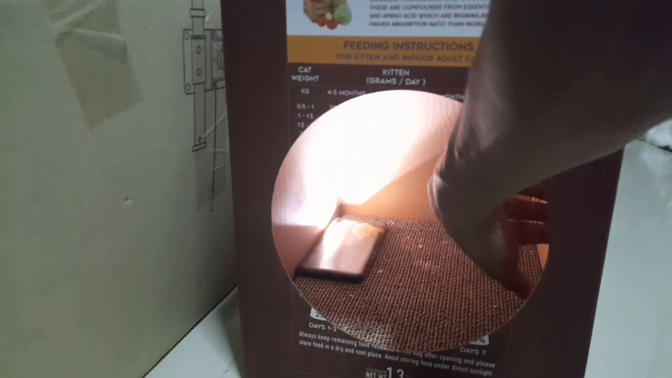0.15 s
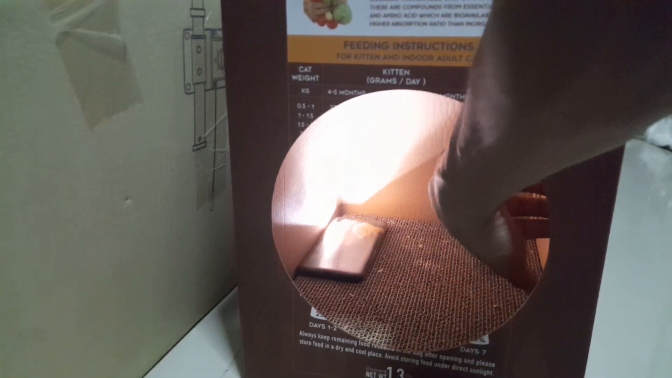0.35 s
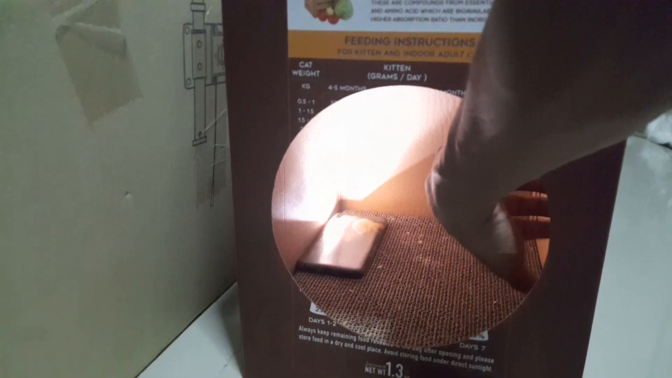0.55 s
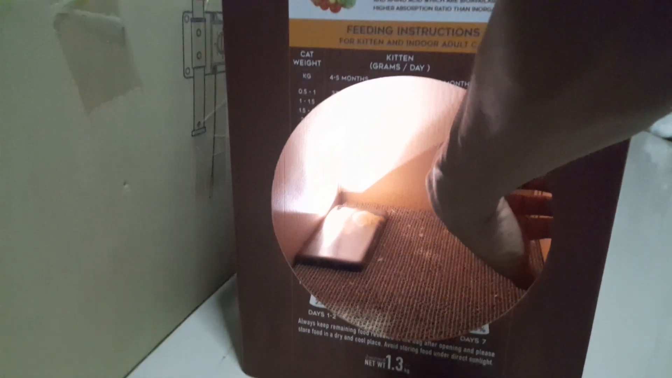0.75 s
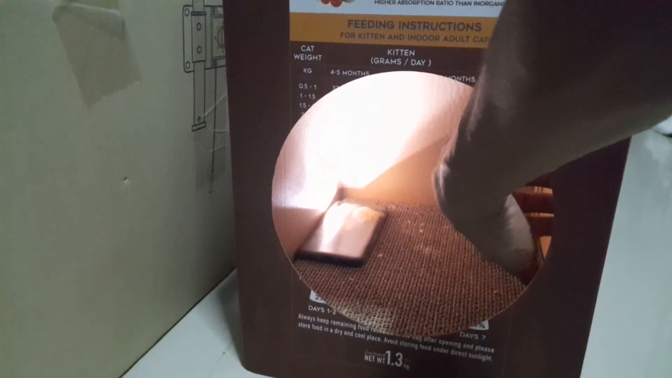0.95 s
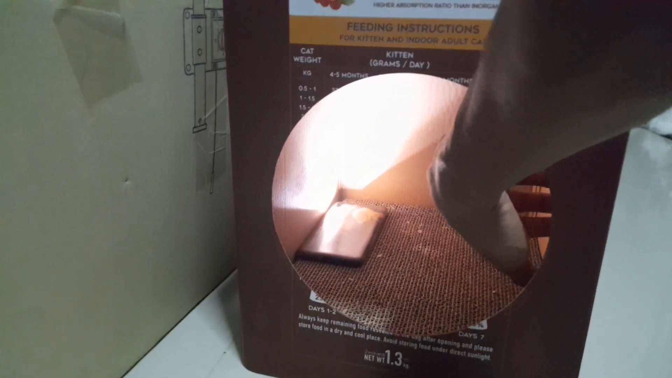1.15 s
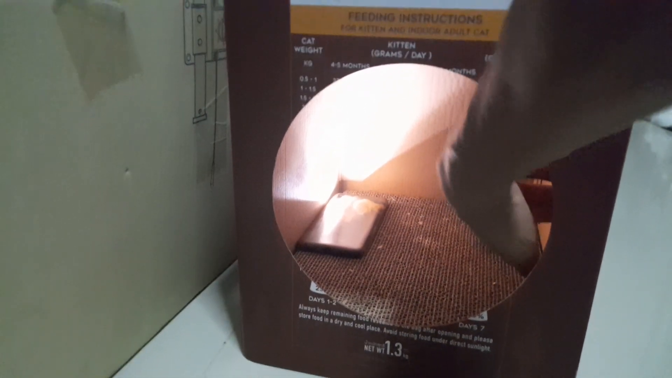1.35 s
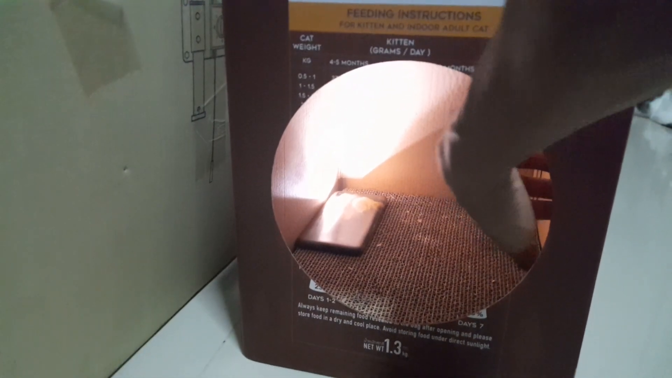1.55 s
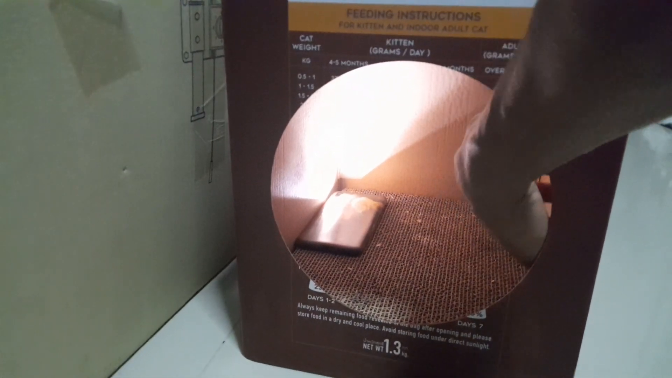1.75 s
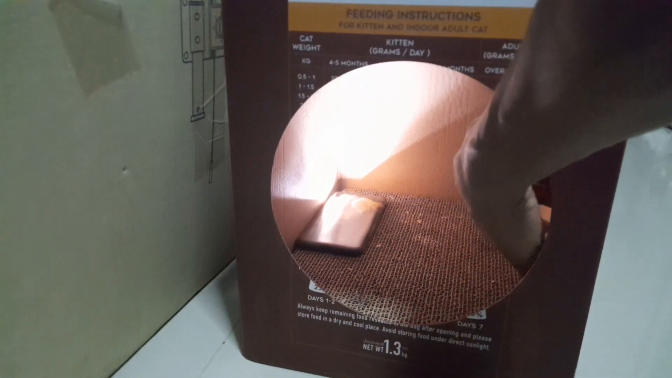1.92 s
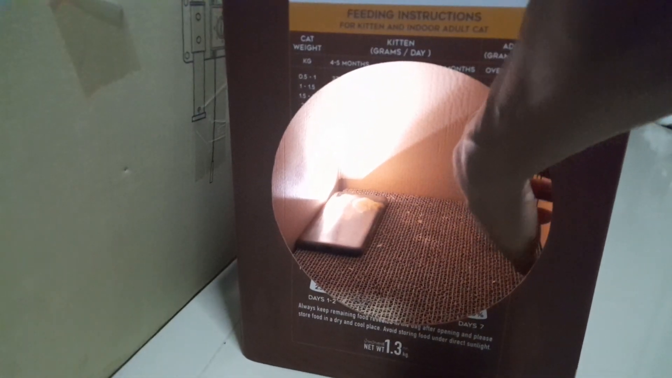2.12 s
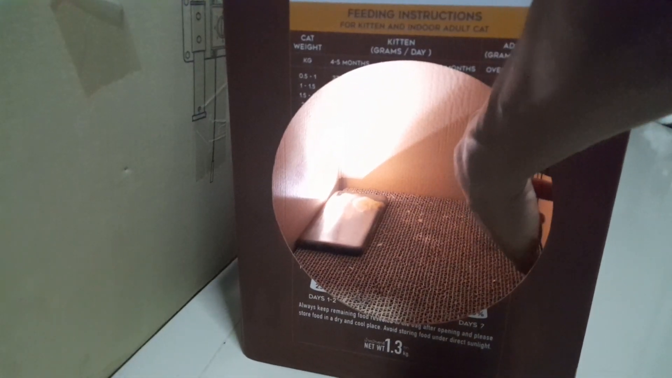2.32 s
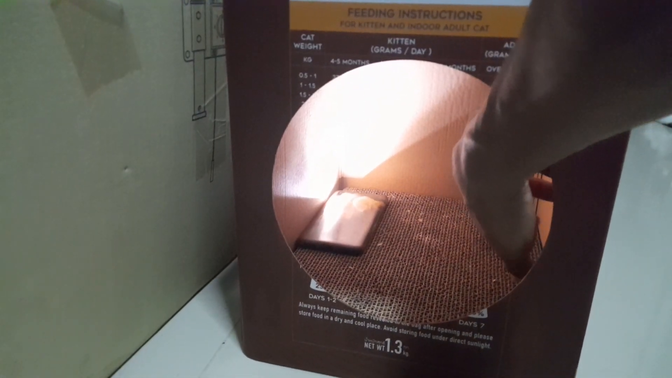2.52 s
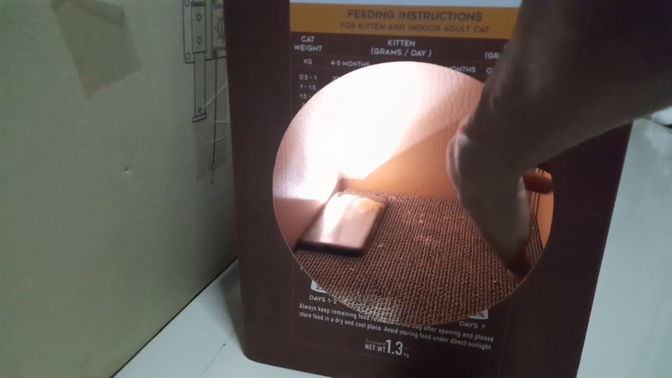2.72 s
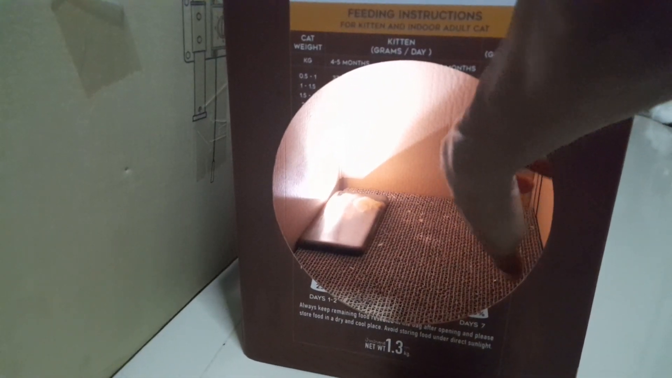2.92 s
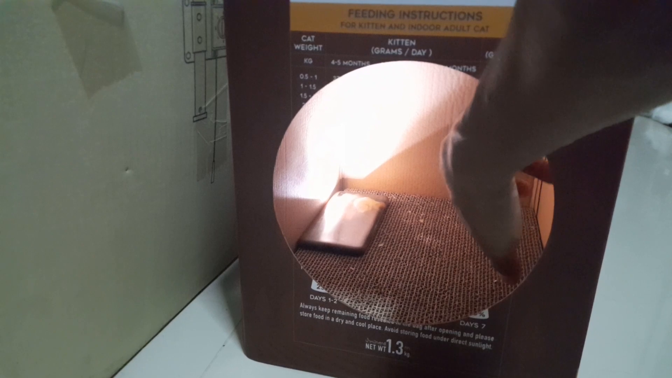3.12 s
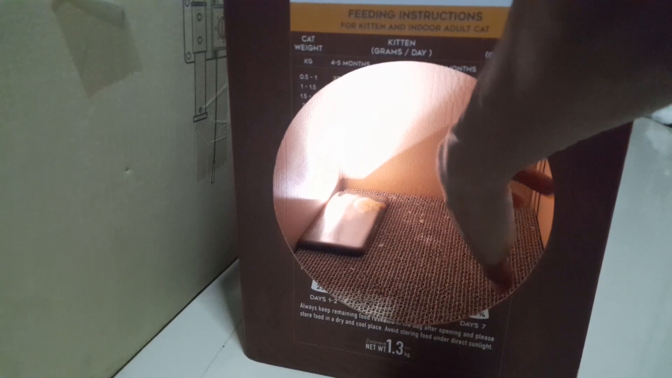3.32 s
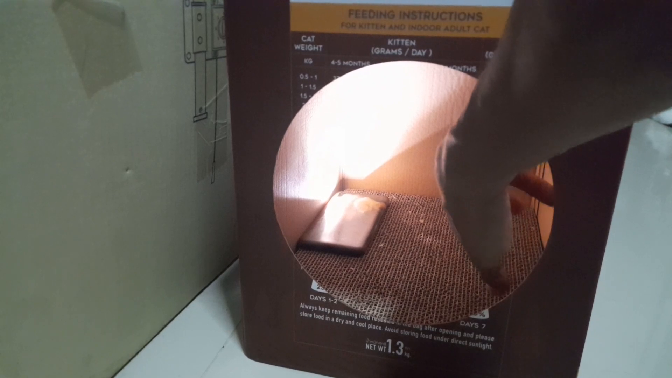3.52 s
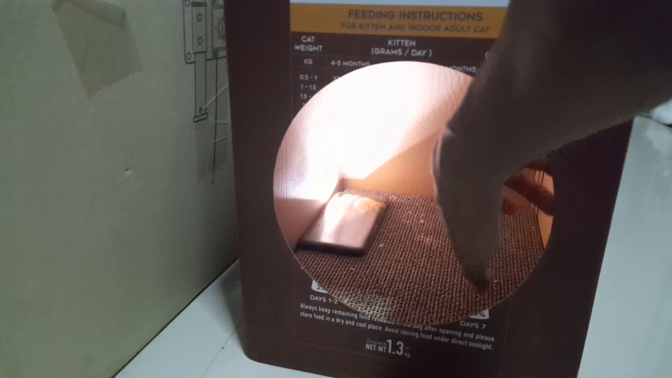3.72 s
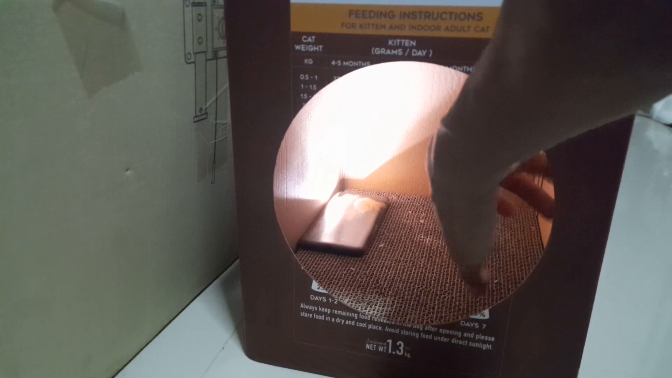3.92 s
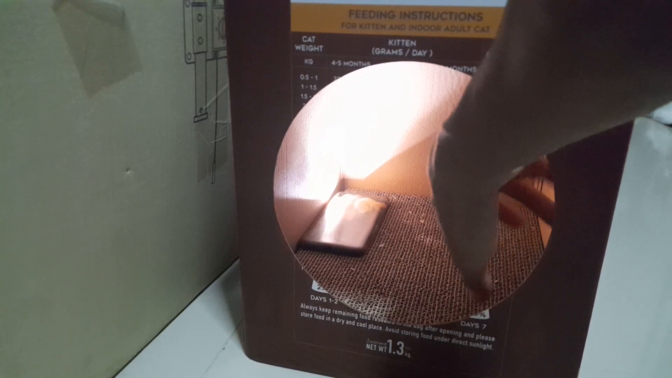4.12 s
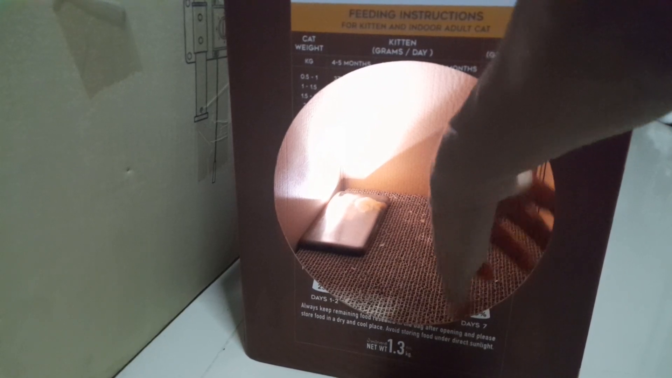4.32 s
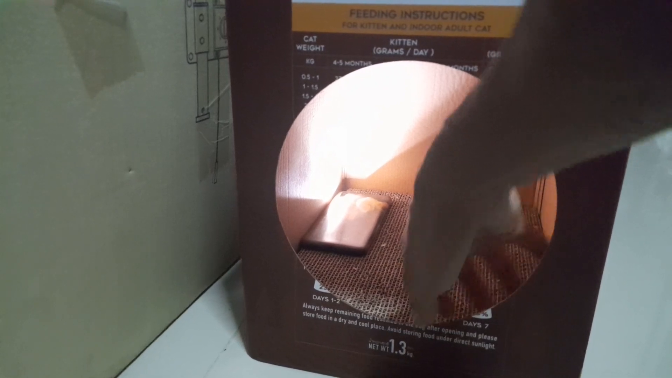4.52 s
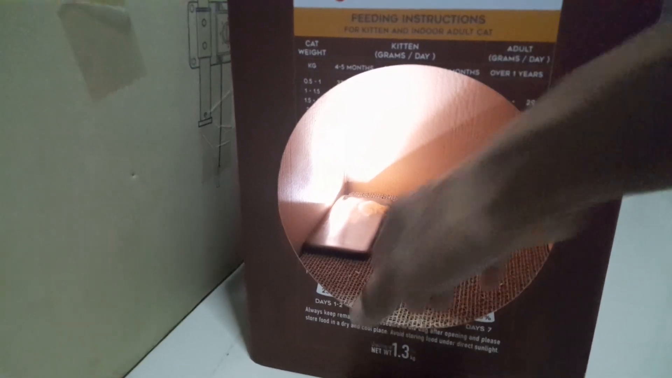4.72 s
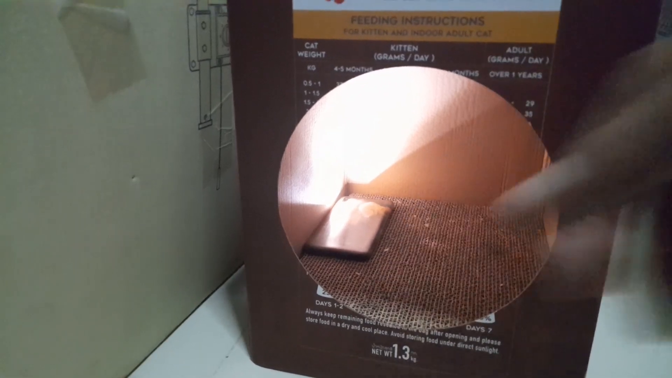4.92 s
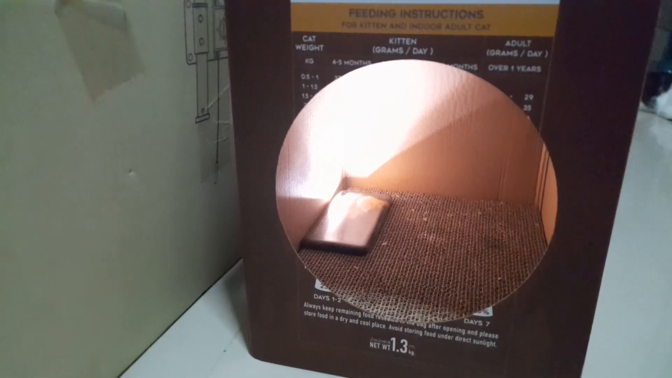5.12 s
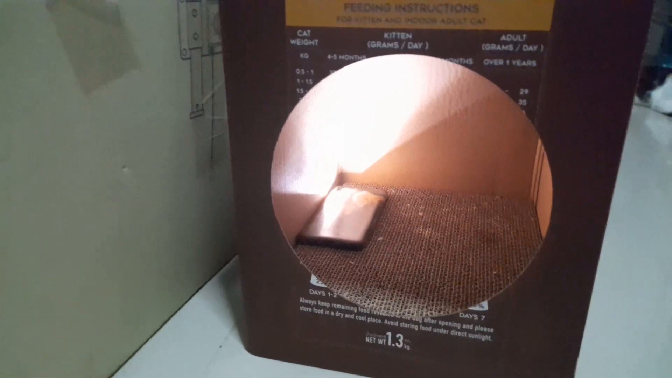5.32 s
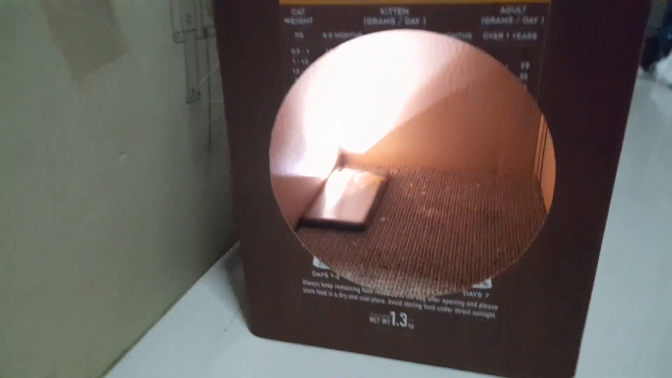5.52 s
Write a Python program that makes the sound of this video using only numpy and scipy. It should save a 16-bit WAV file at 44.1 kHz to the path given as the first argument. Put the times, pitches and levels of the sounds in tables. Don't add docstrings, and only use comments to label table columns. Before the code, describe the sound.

Fingers scratch corrugated cardboard inside a box in quick uneven bursts, with hollow low thumps, dry rasps and sharp taps over faint hiss.

```python
import sys
import numpy as np
from scipy import signal
from scipy.io import wavfile
from scipy.ndimage import uniform_filter1d

SR = 44100
rng = np.random.default_rng(int(sys.argv[2]) if len(sys.argv) > 2 else 0)


def generate_wav(sig):
    pcm = np.round(np.clip(np.atleast_2d(sig).T, -1, 1) * 32767).astype(np.int16)
    wavfile.write(sys.argv[1], SR, pcm)


def volts_from_db(level):
    exponent = np.asarray(level, float) / 20
    return 10 ** exponent


N = 245189

# peak [t/s], length [t/s], level [level/dB], flute rate [f/Hz]
GRAZES = [(0.015, 0.019, -31.5, 160), (.146, 0.048, -34, 162.8), (.578, 0.018, -26, 191.9),
          (.651, .014, -26, 176), (.983, 0.029, -31, 172), (1.138, 0.022, -38.5, 200.5),
          (1.338, 0.026, -41.5, 185), (1.384, .025, -39.5, 239.3), (1.417, 0.03, -32.5, 191.6),
          (1.45, 0.029, -33, 179.4), (1.52, 0.027, -41.5, 159.5), (1.553, .02, -43, 216),
          (1.82, .08, -54, 206.5), (1.925, 0.053, -36.5, 174), (1.975, .03, -42, 133.7),
          (2.041, 0.024, -28, 125.5), (2.11, 0.028, -40.5, 172), (2.165, 0.022, -40, 187.1),
          (2.231, 0.027, -30, 133.9), (2.494, 0.027, -37.5, 213), (2.792, .034, -40.5, 224),
          (3.085, 0.05, -35.5, 145), (3.281, 0.044, -33.5, 196), (3.343, 0.052, -34, 148.6),
          (3.522, 0.042, -37.5, 215.2), (3.573, 0.021, -30.5, 161.3), (3.619, .018, -28.5, 147.3),
          (3.76, 0.039, -38, 206.7), (3.832, 0.071, -46, 176.3), (3.98, .034, -37, 211.3)]
# peak [t/s], length [t/s], level [level/dB], rate [f/Hz]
SETTLES = [
    (4.224, 0.044, -43, 201),
    (4.294, 0.019, -37, 227),
    (4.39, 0.082, -45.5, 188),
    (4.5, 0.04, -55, 184.2),
    (4.547, 0.03, -46.5, 187.9),
    (5.343, 0.034, -56, 191),
    (5.406, 0.042, -56, 231),
    (5.486, 0.081, -52, 185),
]
# peak [t/s], rise [t/s], fall [t/s], level [level/dB], flute rate [f/Hz]
STROKES = [(0.044, .0067, 0.05, -26.5, 175), (0.1, .008, 0.0026, -17.5, 176),
           (0.28, .007, 0.011, -21.5, 160.7), (0.41, 0.02, 0.015, -16.5, 155.6),
           (0.484, 0.011, 0.0046, -24.5, 164), (0.681, .0068, 0.01, -28.5, 168),
           (0.718, 0.013, 0.0063, -29, 160), (0.75, .023, 0.011, -21.5, 184.4),
           (0.79, 0.00707, 0.0025, -21.5, 199), (0.88, 0.011, 0.014, -28.5, 173),
           (1.048, 0.0088, 0.03, -23, 193), (1.101, 0.0069, 0.0021, -22, 172),
           (2.398, 0.006, 0.0087, -19, 172), (2.573, .014, 0.014, -26, 145),
           (2.661, .0095, 0.0027, -25, 135), (2.685, .011, 0.017, -25.5, 166.3),
           (2.953, 0.01, 0.004, -26.5, 168.3), (3.046, 0.0062, 0.0051, -28, 248),
           (3.18, 0.0091, 0.011, -21, 156), (3.204, 0.005, 0.006, -15.5, 195),
           (3.47, .008, 0.016, -30, 260), (3.765, 0.00606, 0.0093, -35.5, 215),
           (3.415, .005, .003, -21, 150), (3.902, .006, .006, -25, 140),
           (3.439, 0.00506, 0.004, -18.5, 311), (2.373, 0.0041, 0.0093, -21, 145.5),
           (2.434, .012, .003, -26, 180), (3.724, 0.00496, .006, -23, 245), (0.74, .005, 0.0089, -27, 265),
           (3.972, 0.0071, .012, -36, 287), (3.938, 0.0041, 0.0034, -25.5, 280),
           (4.057, 0.005, 0.0061, -30.5, 205), (3.87, .01, 0.0071, -41.5, 205),
           (4.134, 0.01, 0.0059, -31, 310), (3.926, .005, .004, -22.5, 333),
           (4.051, .003, 0.0026, -25, 315), (3.192, 0.0067, 0.0035, -32, 322),
           (1.05, 0.022, 0.029, -31, 266.6), (3.79, 0.0071, 0.0072, -39.5, 198),
           (4.01, 0.013, 0.0076, -37.5, 220)]
# peak [t/s], rise [t/s], level [level/dB], flute rate [f/Hz], speed-up [Hz per s]
SPEEDING_FLICKS = [
    (3.430, .0065, -9.5, 225, 4500),
    (3.707, 0.00898, -12.5, 182, 1110),
    (3.927, .007, -11.5, 205, 3200),
    (4.142, .010, -19.5, 179.9, 1700),
]
HAND_MOVES = (0.28, 3.12)
# pitch [f/Hz], width [f/Hz], level with hand by the wall [level/dB], with hand mid-pad [level/dB]
WALLS = [(149.6, 54, 5.5, 3), (172, 13.3, 6.5, -21), (211.3, 48.3, -7.5, 2.5), (256.3, 8.7, 5.5, 2),
         (298.6, 10.5, 3, -4), (354, 29.4, -15, 5)]
# [f/Hz, f/Hz, level/dB, level/dB]
SKIN_MODES = [(480, 40, 7.5, 4), (599, 64, 5.5, 7), (745, 48, 3, 1), (841, 33.6, 8.5, 1), (985, 50, -6, 1),
              (1280, 72, -4.5, -1)]
# [f/Hz, f/Hz, level/dB, level/dB]
NAIL_MODES = [(1570, 54, -1, 8), (1670, 95, 7, -0.5), (1787, 55, -1.5, 10), (2180, 49, -1, -3),
              (2290, 60, -5, 0.5), (2434, 66, -7, -7.5), (2625, 15, -16, -8), (2916, 80, -8, -5),
              (3167, 43, 1, -8), (3350, 70, -8, -8), (3700, 38, 0, -10), (3960, 100, -5, -13),
              (4103, 59, 3, -17), (4510, 210, -7.5, -14)]
# pitch [f/Hz], width [f/Hz], level [level/dB]
ROCKING_MODES = [(57.7, 26.6, 7.3), (115, 20.5, 6.3)]
WALL_TURNS = [0.073, -0.063, -0.13, 0.11, -0.17, 0.056]
SKIN_TURNS = [0.07, -0.15, 0.12, 0.2, -0.027, 0.3]
# time [t/s], weight on the box [level/dB], soft rub [level/dB]
HAND = [(0.0, -45, -32.5), (.06, -32.5, -47.5), (.32, -45.5, -41), (.4, -34.5, -69), (.59, -46.5, -37.5),
        (.74, -41.5, -63), (.88, -43.5, -38.5), (1.1, -38, -45), (1.31, -55, -43), (1.42, -42, -41.5),
        (1.64, -54.5, -47), (2.0, -41, -41), (2.85, -48.5, -43.5), (3.44, -45, -42), (4.68, -59, -56),
        (4.92, -60, -62), (5.56, -51.5, -51)]
# peak [t/s], touch-down to peak [t/s], fall [t/s], level [level/dB],
# nail share above skin [level/dB]
RASPS = [(0.064, 0.036, 0.034, -50, 0.5), (0.266, 0.031, 0.03, -52.5, -2.5),
         (.376, 0.033, 0.013, -47.5, -0.5), (.411, 0.026, 0.039, -47, -1), (.694, 0.029, 0.067, -49, -1.5),
         (.736, 0.0035, 0.017, -43.5, -9.5), (1.086, 0.027, 0.03, -48, -4),
         (1.434, 0.047, 0.016, -49.5, -2), (1.541, 0.028, 0.0056, -50, -15), (1.812, .011, .015, -47, -2),
         (1.845, 0.02, 0.034, -40, -0.5), (1.905, 0.0085, 0.031, -48, -27),
         (2.229, 0.053, 0.0031, -49, -3.5), (2.371, 0.031, 0.022, -40, -2.5),
         (2.583, 0.039, 0.0099, -54, -1.5), (2.677, 0.041, 0.014, -41.5, -7.5),
         (3.036, 0.0035, 0.05, -54.5, -12), (3.187, 0.038, 0.016, -45.5, -2.5),
         (3.303, 0.039, 0.017, -54, 0), (3.436, 0.041, 0.018, -40.5, -8), (3.698, 0.034, 0.02, -41, -3.5),
         (3.93, 0.047, 0.0089, -43.5, -3.5), (4.135, 0.034, 0.015, -47, -5), (4.41, 0.25, 1, -64.5, -9.5),
         (5.46, 0.13, 0.089, -61, -13)]
# time [t/s], tap [level/dB], nail share [level/dB], scuff [level/dB]
TAPS = [(0.085, -70, -17, -44), (0.565, -36, 1, -55), (.643, -34.5, -2.5, -44), (0.869, -38, -2, -53),
        (0.987, -46, -0.5, -48.5), (1.026, -31, -1, -41), (1.051, -40, -0.5, -40.5), (1.166, -65, -23, -52),
        (1.367, -39.5, 2, -64), (1.68, -54, -7, -52), (1.774, -51, -3, -49.5), (1.8, -46.5, 0, -68),
        (1.827, -44, -9, -64), (1.947, -47, -13, -39), (1.976, -51, -23, -48), (2.02, -64, -26, -41),
        (2.325, -41, -4, -44.5), (2.480, -37.5, -17, -73), (2.78, -39, -10, -51.5), (2.927, -44.5, -9, -38),
        (3.033, -36, -27, -69.5), (3.081, -43.5, 3.5, -54.5), (3.151, -42.5, -10, -52),
        (3.255, -41.5, -12, -58), (3.565, -44, 1, -51), (3.893, -51, -23, -40), (3.97, -57, -7, -53),
        (4.045, -32, -7.5, -41.5), (4.278, -43, -16, -56), (4.556, -47, -9, -46)]
# time [t/s], tap [level/dB], nail share [level/dB], scuff [level/dB]
SNAGS = [(0.229, -43, -16, -51), (0.547, -42, -3, -56), (0.677, -46, -20, -66), (0.732, -36, -1, -59),
         (0.864, -30.5, -9, -63), (1.263, -55, 9, -70.5), (1.387, -47, -12, -55), (1.514, -37, -10, -66),
         (1.9, -40, -5, -64), (2.346, -32, -3, -71), (2.576, -37, -5, -56), (2.632, -41, -4, -56),
         (3.175, -28, -9, -63), (3.389, -40, -2, -64), (3.405, -36, 5, -58), (3.419, -23, -8, -64),
         (3.677, -39, -2, -65), (4.109, -34, -16, -66), (.054, -42, -8, -62), (.355, -39, -3, -60),
         (.374, -34, -2, -64), (.875, -34, -2, -62), (1.809, -42, -1, -56), (1.845, -35, 4, -62),
         (2.097, -49, -15, -67), (2.222, -32.5, 3, -60), (2.367, -31, -6, -64), (2.64, -33, -5, -59),
         (3.683, -33, -3, -60), (3.909, -35, -8, -62), (4.122, -38, -10, -62), (.713, -38, -3, -64),
         (1.07, -28, -5, -62)]
# peak [t/s], touch-down to peak [t/s], fall [t/s], level [level/dB]
FLICKS = [(0.092, 0.034, 0.052, -63), (0.278, 0.022, 0.017, -55), (0.41, 0.056, 0.081, -52.5),
          (0.569, 0.0034, 0.008, -52), (0.728, 0.047, 0.12, -52.5), (0.873, 0.0068, 0.017, -56),
          (1.028, 0.0038, 0.0056, -49), (1.07, 0.021, 0.047, -53), (1.171, 0.009, 0.024, -63),
          (1.428, 0.046, 0.32, -65), (1.827, 0.015, 0.11, -61), (1.93, 0.0054, 0.033, -51.5),
          (2.029, 0.0044, 0.01, -49), (2.227, 0.0069, 0.0096, -52.5), (2.368, 0.029, 0.065, -48.5),
          (2.578, 0.03, 0.027, -55), (2.645, 0.018, 0.078, -54.5), (3.082, 0.023, 0.046, -56.5),
          (3.188, 0.042, 0.04, -47.5), (3.306, 0.004, 0.032, -53), (3.423, 0.024, 0.019, -38.5),
          (3.578, 0.016, 0.013, -55.9), (3.691, 0.023, 0.031, -40.5), (3.912, 0.025, 0.041, -44),
          (4.124, 0.01, 0.057, -57), (4.38, 0.086, 0.11, -62), (4.558, 0.0069, 0.012, -61),
          (5.44, 0.086, 0.35, -61.5)]
# [f/Hz], density [level/dB per Hz]
FIZZ = [(4500, -5), (6200, -6), (8000, -2.5), (9800, 1), (11500, -6.5), (14000, -4.5), (15800, -23)]
# [f/Hz], likeness [-1 to 1]
FIZZ_LIKENESS = [(5000, 0.014), (8000, 0.37), (11000, 0.97)]
# [f/Hz], density [level/dB per Hz]
ROOM = [(20, -30), (50, 5), (88, -7.5), (130, 1.5), (230, -4.5), (480, -10), (1270, -24), (2200, -26.5),
        (3200, -26), (4300, -21), (6500, -33), (8600, -36), (9900, -19.5), (14300, -28), (15000, -38)]
# [f/Hz], likeness [-1 to 1]
ROOM_LIKENESS = [(60, 0.77), (130, 1), (290, 0.81), (640, 0.72), (1410, -0.023), (3100, -0.38),
                 (6820, 0.45), (10000, 1), (15000, 0.62)]
# [f/Hz], difference [level/dB]
LEAN = [(60, -5), (180, -2.5), (550, 4.5), (1650, 0.5), (4970, -1), (15000, 2)]
# from [f/Hz], to [f/Hz], share of time silent [%]
TOP_DROPOUTS = [(14650, 14900, 12.), (14900, 15150, 30.), (15150, 15450, 50.),
                (15450, 15800, 55.), (15800, 22050, 100.)]


def evened(x):
    return x / np.sqrt(np.mean(x ** 2) + 1e-20)


def read(points, hz):
    f, value = np.transpose(points)
    return np.interp(np.log(hz + 1), np.log(f + 1), value)


def add(mix, first, sound):
    mix[..., first:first + sound.shape[-1]] += sound


def hand_track(times, values):
    return np.interp(np.arange(N) / SR, times, values)


def burst_times(peak, lead, fall):
    first = max(round((peak - lead) * SR), 0)
    last = min(round((peak + 6 * fall) * SR), N)
    return first, np.arange(first, last) / SR - peak


def swell(peak, rise, fall, db, steep_db):
    first, t = burst_times(peak, 3 * rise, fall)
    u = t / np.where(t < 0, max(rise, .003), max(fall, .003))
    skirt = np.where(t < 0, 0.7 * abs(u) ** 1.79, np.sqrt(1 + 4 * u ** 2) - 1)
    return first, t, volts_from_db(db - steep_db * skirt)


def touch(peak, rise, fall, db, climb_db, drop_db):
    first, t = burst_times(peak, rise + .03, fall)
    since_landing = t + rise
    landed = 0.069 + 0.71 / (1 + np.exp(np.clip(-since_landing / 0.00022, -50, 50)))
    approach = np.clip(since_landing / 0.018 + 1, 0, 1)
    climb = climb_db * t / max(rise, .003)
    drop = -drop_db * (np.maximum(t, 0) / max(fall, .003)) ** 0.95
    shape_db = np.where(t < 0, climb, drop)
    return first, approach * landed * volts_from_db(db + np.clip(shape_db, -80, 6))


def slips(per_s, spread_db):
    size = volts_from_db(spread_db * np.minimum(rng.exponential(1, N), 5)) * rng.choice([-1., 1.], N)
    return evened(size * (rng.random(N) < per_s / SR))


def ring(x, modes, apart, wander_db=0):
    out = np.zeros((2, N))
    place = hand_track(HAND_MOVES, [0, 1])
    moving = wander_db > 0
    for k, ((hz, width, *db), turn) in enumerate(zip(modes, apart)):
        r = np.exp(-np.pi * width / SR)
        coupling = volts_from_db(db[0]) + (volts_from_db(db[-1]) - volts_from_db(db[0])) * place
        spots = np.linspace(0, N, 48)
        level, shift, bend = (np.interp(np.arange(N), spots, v) for v in rng.standard_normal((3, 48)))
        pitch = hz * (1 + moving * 0.015 * bend)
        spin = np.exp(2j * np.pi * np.cumsum(pitch) / SR)
        drive = coupling * volts_from_db(wander_db * level) * x / spin
        rung = spin * signal.lfilter([1 - r], [1, -r], drive)
        right = np.exp(2j * np.pi * (turn + moving * 0.22 * shift)) * rung
        out += 2 * (-1) ** k * np.array([rung.real, right.real])
    return out


def stereo_noise(spectrum, likeness, patchy_db):
    frames, hz = N // 256 + 5, np.fft.rfftfreq(1024, 1 / SR)
    a, b, c, d, patches = rng.standard_normal((frames, 513, 5)).T
    patches = evened(uniform_filter1d(uniform_filter1d(patches, 10, 0), 10, 1))
    same = np.clip(read(likeness, hz), -1, 1)[:, None]
    left = a + 1j * b
    right = same * left + np.sqrt(1 - same ** 2) * (c + 1j * d)
    lean = read(LEAN, hz) / 2
    sides_db = np.array([lean, -lean])[:, :, None]
    z = np.array([left, right]) * volts_from_db(read(spectrum, hz)[:, None] + patchy_db * patches + sides_db)
    return evened(signal.istft(z, nperseg=1024, noverlap=768)[1][:, :N])


def flute_bumps():
    rise_share = 0.42
    grazes = [(s, rise_share * length, (1 - rise_share) * length, db, hz)
              for s, length, db, hz in GRAZES + SETTLES]
    flicks = [(s, rise, 0.81 * rise, db, hz, speedup) for s, rise, db, hz, speedup in SPEEDING_FLICKS]
    push, effort = np.zeros(N), np.zeros(N)
    wobble = evened(uniform_filter1d(uniform_filter1d(rng.standard_normal(N), 200), 200))
    for peak, rise, fall, db, rate_hz, *speedup in grazes + STROKES + flicks:
        first, t, gain = swell(peak, rise, fall, db, steep_db=3.5)
        place = np.interp(peak, HAND_MOVES, [0, 1])
        glide = (1 - place) * -0.102 + place * np.clip(0.08 * (db + 25), -.12, .36)
        hz = rate_hz * (1 + glide * 0.85 * np.tanh(t / 0.0086))
        if speedup:
            hz = np.clip(rate_hz + speedup[0] * t, 120, 300)
        uneven_hz = hz * (1 + 0.089 * wobble[first:first + len(t)])
        turn = 2 * np.pi * (rng.random() + np.cumsum(uneven_hz) / SR)
        add(push, first, gain * (0.93 * np.cos(turn) + 0.14 * np.cos(2 * turn)))
        add(effort, first, gain * (.55 if speedup else 1))
    push = signal.sosfilt(signal.butter(2, 95., "high", fs=SR, output="sos"), push)
    return push, effort


def stumbles(effort, jerks):
    low = signal.butter(4, [90, 420], "band", fs=SR, output="sos")
    knocks = effort * jerks
    for s, db, *_ in TAPS:
        knocks[round(s * SR)] -= volts_from_db(db + 42.0)
    return signal.sosfilt(low, knocks) / np.std(signal.sosfilt(low, jerks))


def rocking(effort):
    t, rock_db, _ = np.transpose(HAND)
    load = abs(uniform_filter1d(effort, 2500)) ** 0.36
    load /= uniform_filter1d(load, 20000) + 1e-4
    shake = ring(rng.standard_normal(N), ROCKING_MODES, [.14, -.1])
    return volts_from_db(hand_track(t, rock_db)) * load * evened(shake)


def booms():
    push, effort = flute_bumps()
    jerks = slips(per_s=250., spread_db=1.5)
    stumble = stumbles(effort, jerks)
    walls = ring(push + 0.41 * stumble, WALLS, WALL_TURNS)
    heard = 0.39 * push + 0.086 * stumble + 0.54 * walls
    sides = volts_from_db(np.array([[-1.5], [1.4]]))
    air = ring(effort * jerks, SKIN_MODES, [.1, -.15] * 3)
    air /= np.std(ring(jerks, SKIN_MODES, np.zeros(len(SKIN_MODES))))
    return heard * sides + rocking(effort) + volts_from_db(-26.5) * air


def inside(x, t60, direct):
    t, out = np.arange(3000) / SR, 0
    for k in range(4):
        signs = rng.choice([-1., 1.], (2, len(t)))
        echoes = signs * (rng.random((2, len(t))) < .05) * volts_from_db(-60 * t / t60)
        echoes /= np.linalg.norm(echoes, axis=1, keepdims=True)
        echoes[:, 0] = direct
        away = (1.7 * np.arange(N) / SR - k) % 4 - 1
        share = np.where(abs(away) < 1, np.cos(np.pi * away / 2), 0)
        out = out + signal.oaconvolve(share * x, echoes / np.sqrt(1 + direct ** 2), axes=1)[:, :N]
    return out


def rasps():
    t, _, rub_db = np.transpose(HAND)
    skin = volts_from_db(hand_track(t, rub_db) - 17.0)
    nail = skin * volts_from_db(-8.5)
    taps = TAPS + [(s, db - 6.5, *rest) for s, db, *rest in SNAGS]
    rise_s, fall_s = 0.0018, 0.0094
    scuffs = [(s + rise_s, rise_s, fall_s, scuff_db, nail_db) for s, _, nail_db, scuff_db in taps]
    for peak, rise, fall, db, nail_db in RASPS + scuffs:
        add(skin, *touch(peak, rise, fall, db, climb_db=15.0, drop_db=6.5))
        add(nail, *touch(peak, rise, fall, db + nail_db, climb_db=5.0, drop_db=7.0))

    clumps = volts_from_db(0.37 * evened(uniform_filter1d(rng.standard_normal(N), 150)))
    jerks = evened(clumps * slips(per_s=1400., spread_db=2.5))
    skin, nail = skin * jerks, nail * jerks

    crackles = rng.choice([-1., 1.], (len(taps), 200)) * (rng.random((len(taps), 200)) < .1)
    if len(taps):
        crackles = rng.choice([-1., 1.], (len(taps), 200)) * (rng.random(200) < .1)
    snaps = np.exp(-np.arange(200) / 18.0) * crackles
    snaps[:, 0] = 3.13
    ticks = np.zeros(N)
    for (s, db, nail_db, _), snap in zip(taps, snaps):
        add(skin, round(s * SR), volts_from_db(db + 4.0) * snap)
        add(nail, round(s * SR), volts_from_db(db + nail_db - 4.0) * snap)
        add(ticks, round(s * SR), volts_from_db(db + .4 * nail_db + 9.0) * snap)

    edge = signal.sosfilt(signal.butter(2, [550, 2300], "band", fs=SR, output="sos"), ticks)
    out = np.array([edge, np.roll(edge, -4)])
    for drive, modes, edges_hz, share, apart in [(skin, SKIN_MODES, [380, 1000], .95, SKIN_TURNS),
                                                 (nail, NAIL_MODES, [1300, 3600], 1.1, [.26, -.25] * 7)]:
        band = signal.butter(2, edges_hz, "band", fs=SR, output="sos")
        rung = ring(drive, modes, apart, wander_db=2.0) / np.std(ring(jerks, modes, apart))
        broad = signal.sosfilt(band, drive) / np.std(signal.sosfilt(band, jerks))
        out = out + rung + share * inside(broad[None], t60=0.02, direct=0.55)
    return out * volts_from_db(np.array([[-1.5], [.4]]))


def fizz():
    t, weight_db, rub_db = np.transpose(HAND)
    rustle_db = -53.5 + 0.26 * (weight_db - weight_db.mean()) + 0.22 * (rub_db - rub_db.mean())
    effort = volts_from_db(hand_track(t, rustle_db) - 7.5)
    for peak, rise, fall, db in FLICKS:
        add(effort, *touch(peak, rise, fall, db + 1.5, climb_db=10.0, drop_db=17.5))
    fibres = uniform_filter1d(slips(per_s=1400.0, spread_db=1.0) ** 2, 60)
    grain = volts_from_db(3.8 * evened(abs(fibres) ** 0.21))
    hiss = stereo_noise(FIZZ, FIZZ_LIKENESS, patchy_db=-1.2) * volts_from_db(np.array([[-1.6], [.7]]))
    return effort * evened(grain / grain.mean() * hiss)


def room_tone():
    return volts_from_db(-53.5) * stereo_noise(ROOM, ROOM_LIKENESS, patchy_db=1.0)


def scene():
    return booms() + rasps() + fizz() + room_tone()


def band_limit(x):
    return signal.sosfilt(signal.butter(12, 15780, fs=SR, output="sos"), x)


def record(dry):
    x = signal.sosfilt(signal.butter(4, 38, "high", fs=SR, output="sos"), dry)
    _, _, z = signal.stft(x, nperseg=1024)
    hz = np.fft.rfftfreq(1024, 1 / SR)
    for lo_hz, hi_hz, silent_percent in TOP_DROPOUTS:
        band = (hz >= lo_hz) & (hz < hi_hz)
        power = uniform_filter1d((abs(z[:, band]) ** 2).mean((0, 1)), size=3)
        luck_db = 3.0 * np.repeat(rng.standard_normal(len(power)), 4)[:len(power)]
        power /= uniform_filter1d(power, size=60) ** .9 * volts_from_db(luck_db)
        z[:, band] *= power > np.percentile(power, silent_percent)
    mix = signal.istft(z, nperseg=1024)[1][:, :N]
    return band_limit(mix)


dry = scene()
out = record(dry)
generate_wav(out)
```